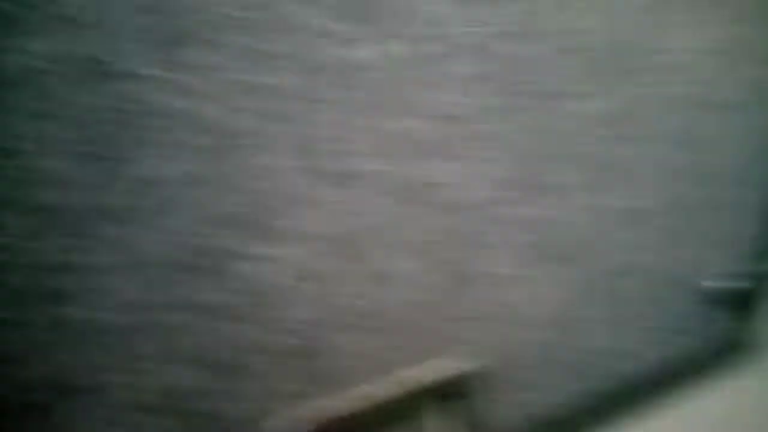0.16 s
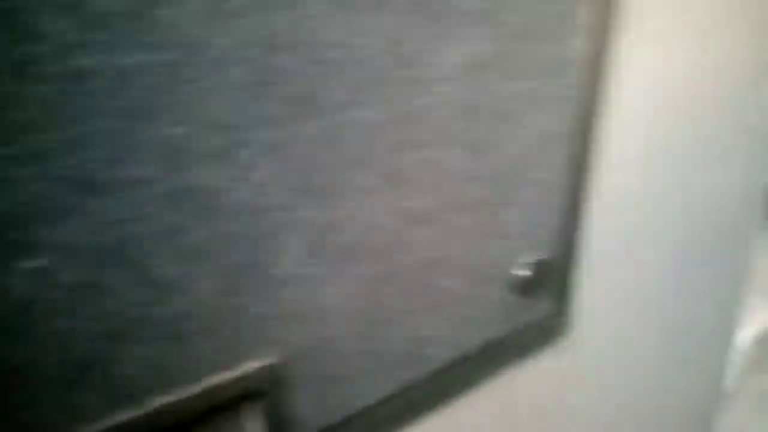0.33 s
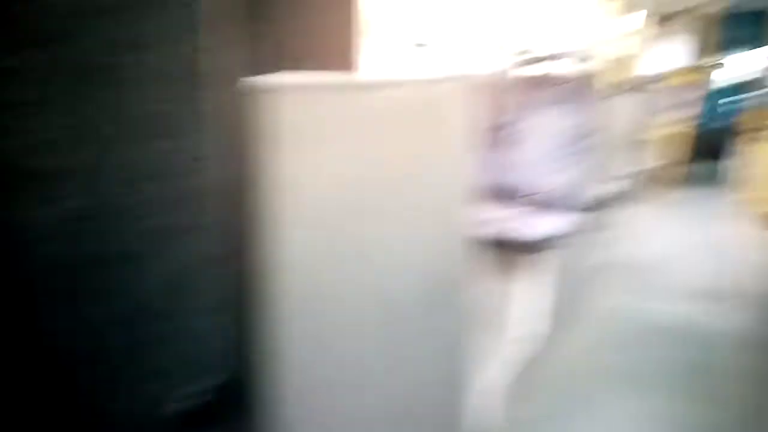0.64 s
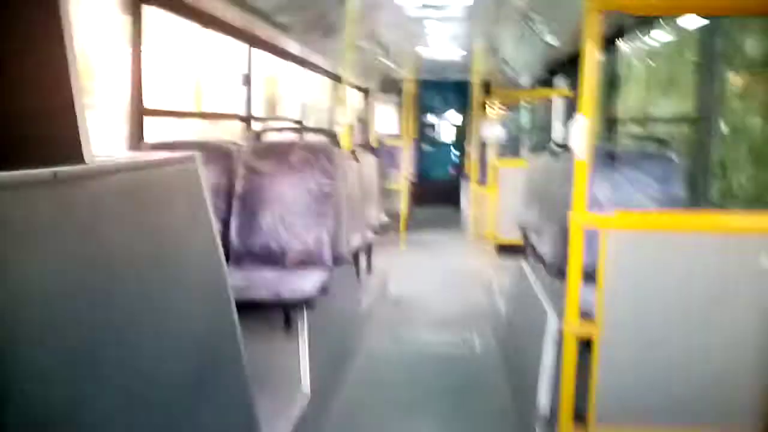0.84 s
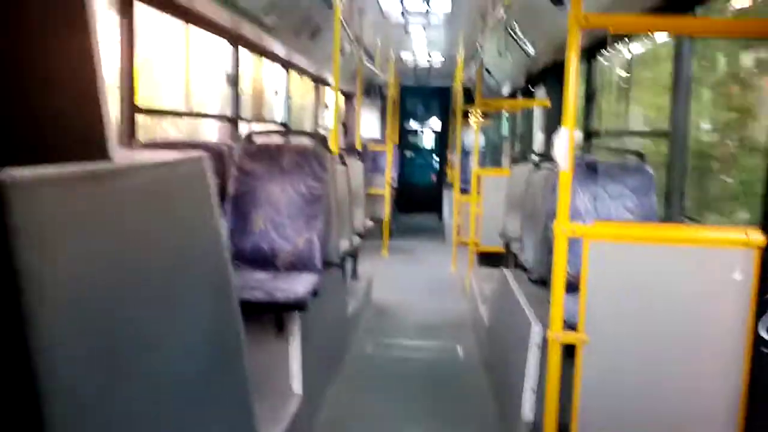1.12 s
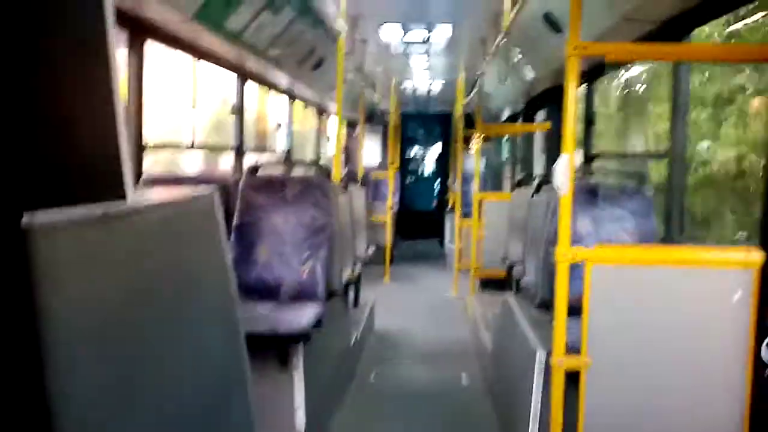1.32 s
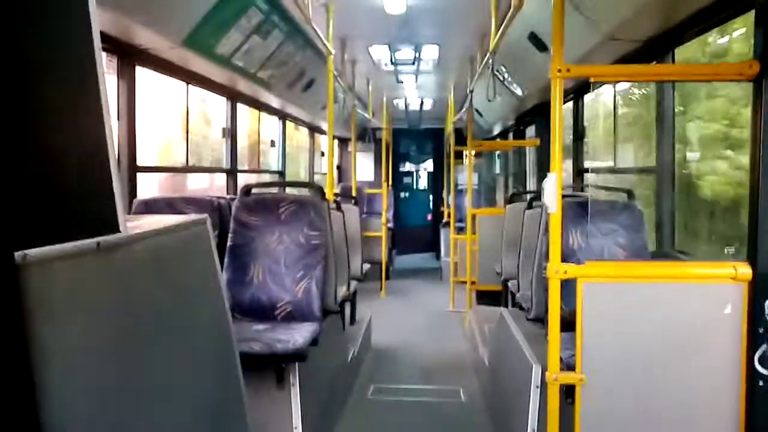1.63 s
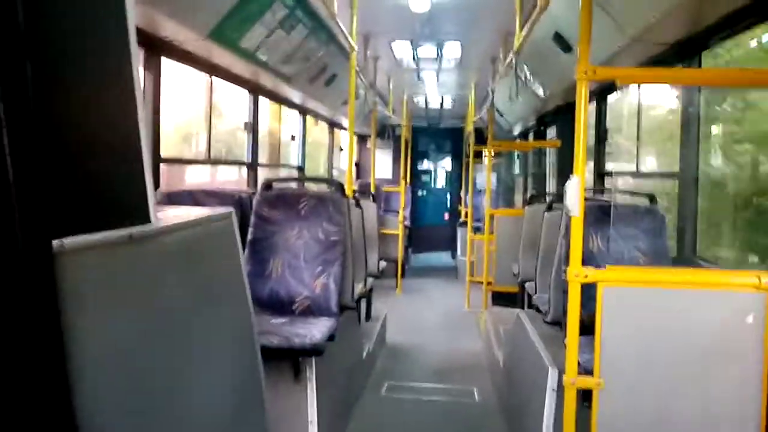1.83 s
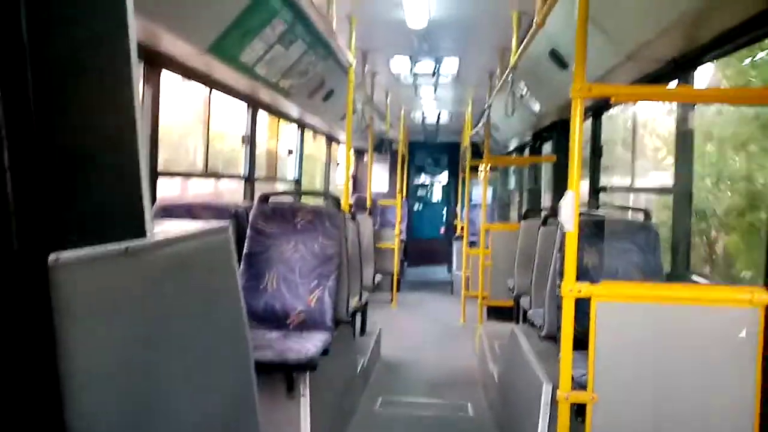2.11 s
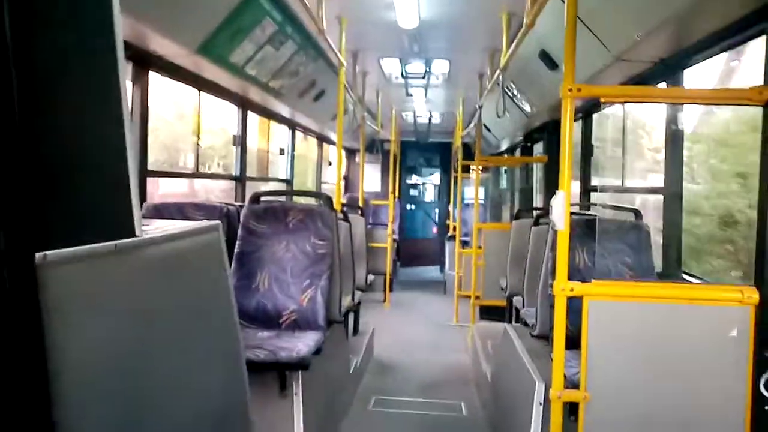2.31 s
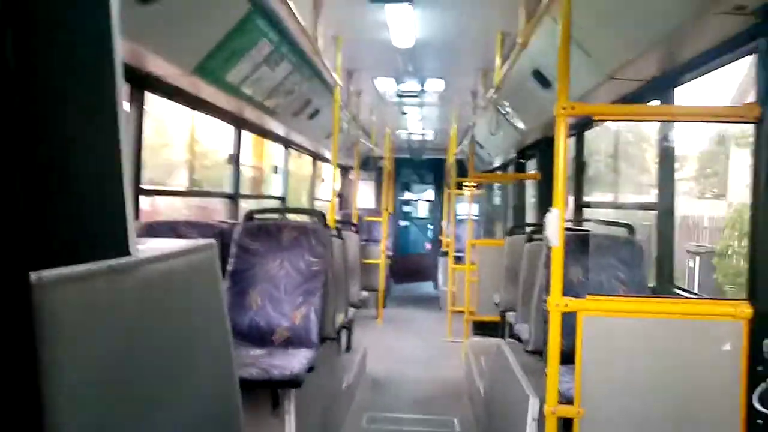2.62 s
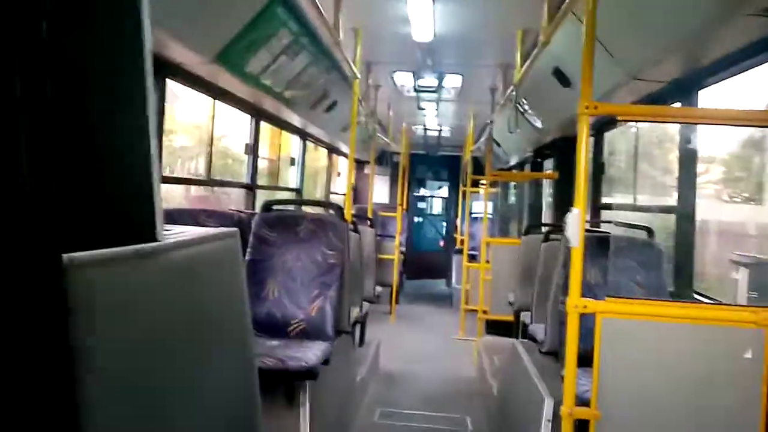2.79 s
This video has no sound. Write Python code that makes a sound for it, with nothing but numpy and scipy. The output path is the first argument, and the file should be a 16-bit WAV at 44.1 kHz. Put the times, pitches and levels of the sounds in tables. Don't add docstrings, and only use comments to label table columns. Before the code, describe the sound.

Inside a running city bus, a throbbing low hum and road roar continue throughout. Early bumps shake the fittings, engine pitch sinks slightly, and small finger clicks sit close on a handheld stereo microphone, bass heavier left.

```python
import sys
import numpy as np
from scipy import signal
from scipy.fft import rfft, irfft, next_fast_len
from scipy.io import wavfile
from scipy.ndimage import uniform_filter1d

SR = 44100
rng = np.random.default_rng(int(sys.argv[2]) if len(sys.argv) > 2 else 0)


def field_ratio(decibels):
    return 10 ** (np.asarray(decibels, dtype=float) / 20)


def file_out(sig):
    cols = np.atleast_2d(sig).T
    lim = np.clip(cols, -1, 1)
    pcm = np.round(lim * 32767).astype(np.int16)
    wavfile.write(sys.argv[1], SR, pcm)


N = 130095

# t/s, f/Hz
ENGINE_SPEED = [(0, 424), (.7, 423), (1.0, 415), (1.3, 412), (1.6, 407), (2.0, 405), (2.95, 405.5)]
# t/s, f/Hz
ROAD_SPEED = [(0.0, 302.2), (0.09, 294.0), (0.43, 296.2), (2.95, 299.1)]
WHINE_HZ, AXLE_HZ = 405, 299
# f/Hz, level before turn/dB, level after/dB, change t/s, wobble/dB
ENGINE_TONES = [(47, -36.5, -49.5, 1.7, 6), (122.2, -36.5, -56.5, 0.49, 6.5), (142.7, -38.5, -56.5, 1.2, 3),
                (181.2, -34, -46.5, 1.36, 2.5), (200.8, -46.5, -34, 1.37, 2), (215, -43, -34, 1.18, 0),
                (362.2, -48, -47, 1.5, 2.5), (386.8, -45, -42, 1.7, 1), (406.3, -39.5, -39.5, 0.87, 1.5),
                (643, -50.5, -54, 2.1, -4), (710, -54.5, -52, 1.4, 10.5), (805, -47.5, -51, 0.52, 1),
                (1130, -39, -55.5, 0.27, -1.8), (1182, -47, -64, 0.28, 4.5), (2370, -52.5, -58.5, 0.52, 0),
                (2397, -53, -65.5, 0.61, 5)]
# f/Hz, level before turn/dB, level after/dB, change t/s, wobble/dB
WHEEL_TONES = [(58.46, -45, -41, 1.9, -3.5), (300.1, -35, -32, 1.4, 1.7), (449, -56.5, -47, 0.94, 4.5),
               (492.4, -46.5, -46.5, 1.3, 1), (540.7, -43.5, -47.5, 1.3, 0.5), (598, -56.5, -44.5, 1.3, 0),
               (1016, -50.5, -52, 1.1, 3.5), (1116, -54.5, -56, 0.82, 1.5)]
CHANGE_S, WOBBLE_HZ, DRIFT_SHARE, PORT_SPREAD = 0.2, 5.037, 0.00405, 0.31
# tone f/Hz, t/s, lift/dB, half length/s
SWELLS = [(58.5, .2, 0, .06), (58.5, 2.62, 11, .08), (58.5, 2.86, 4.5, .06), (91.4, 0.29, 6.5, .04),
          (91.4, 0.25, -5.5, 0.063), (91.4, 0.35, 4.5, .04), (91.4, .68, -6.5, 0.093),
          (91.4, .84, 7.5, 0.044), (91.4, 1.1, -11, 0.02), (182.2, 0.19, 8, 0.045), (182.2, 0.4, 3, .05),
          (182.2, .66, -11, 0.11), (182.2, .86, -3, 0.054), (182.2, 1.05, -9.5, 0.086),
          (182.2, 0.82, 2, .07), (202.8, 1.58, 5.5, 0.049), (202.8, 2.9, -2, 0.035), (216.4, 1.2, 8, 0.071),
          (216.4, 2.88, 1.5, 0.067), (298.4, 0.011, -1.5, 0.05), (298.4, .17, 4.5, 0.1),
          (298.4, 1.43, -4.5, 0.057), (298.4, 1.3, 0.5, 0.053), (298.4, 1.7, -5, .05),
          (298.4, 2.133, 4.5, 0.061), (298.4, 1.85, 1, 0.091), (298.4, 2.47, -3.5, 0.056),
          (298.4, 2.75, 4.5, 0.091), (406.6, 1.504, 7, 0.11), (406.6, 0.84, 4.5, .04),
          (494.4, 0.58, 10.5, 0.17), (494.4, 1.55, 13, 0.031), (494.4, 2.55, 7.5, 0.2),
          (543, 2.1, 10, 0.051), (543, 2.16, 7, .04), (543, 2.47, 14.5, 0.055), (644, 1.08, 14.5, 0.13),
          (644, 0.913, 5, 0.076), (644, 1.34, 5, 0.12), (644, 0.51, 8, .08), (715, 2.35, -10, .15),
          (706, 0.055, -11, .1), (805.6, .02, -6, 0.052), (805.6, 0.18, 6, 0.14), (805.6, .43, 4.5, .05),
          (805.6, 2.6, 4, 0.063), (805.6, 3.1, 5.5, .08), (805.6, 1.8, -1, .05), (1110, .52, 10, 0.083),
          (2365, 0.19, 5, 0.046), (1013, .6, -2, .06), (1013, 1.9, 3.5, 0.044)]
SWELL_WIDTH_LOG_F = .012
# t/s, level/dB
BOOM = [(0.0, -34.5), (0.02, -27.5), (1.02, -35), (1.2, -28.5), (1.48, -35), (1.52, -25.5), (1.75, -36),
        (1.82, -25), (2.0, -29.5), (2.09, -25), (2.26, -30), (2.29, -44), (2.45, -23.5), (2.71, -35.5),
        (2.85, -27), (2.95, -29)]
BOOM_HZ, BOOM_LIFT_DB = 91.3, -3
# f/Hz, level/dB per Hz
RUMBLE_COLOUR = [(20, -34), (36, -17.5), (50, 2), (90, -2), (280, -4), (400, -8), (1020, -15.5),
                 (1700, -38)]
RUMBLE_DB, RUMBLE_SHARE = -28.5, 0.52
# f/Hz, level/dB per Hz
ROAR_COLOUR = [(600, -9), (1200, 0.5), (1900, -4), (2700, -4), (3700, -2.5), (4700, -6.5), (6300, -7),
               (8000, -30.5)]
# t/s, level/dB
PANEL = [(0.0, -37.5), (0.43, -38.5), (1.06, -35), (1.27, -38), (1.58, -40.5), (2.5, -39.5), (2.95, -40)]
ROAR_LIFT_DB = 3.5
# t/s, level/dB
RUB = [(0, -61), (.06, -72), (.5, -67), (.56, -64), (.61, -60), (.64, -70), (.68, -59.5), (.78, -59.5),
       (1.0, -65), (1.08, -62), (1.14, -68), (1.16, -71), (1.35, -79.5), (1.8, -85.5), (2.35, -83.5),
       (2.45, -76.5), (2.95, -87.5)]
# f/Hz, level/dB per Hz
RUSTLE_COLOUR = [(7000, 5), (7600, -2.5), (8600, -2), (13300, -12.5), (13900, -17.5), (14400, 0),
                 (15450, 2), (15800, -25)]
RUB_LIFT_DB, RUB_LEFT_DB = 11, -11.5
# t/s, peak level/dB, ring t60/s, left share/dB, 15 kHz port ring/dB
TICKS = [
    (0.0014, -49.5, 0.039, -24, -11),
    (0.163, -32.5, 0.03, -2, -7),
    (0.2929, -36, 0.041, -7, -10),
    (0.5557, -40.5, 0.054, -9, -7.5),
    (1.3872, -53, 0.04, -12, -12),
    (1.4897, -42.5, 0.025, -9, -15),
    (1.8025, -47.5, 0.073, -9, -16.5),
    (1.997, -41.5, 0.027, -13, -15),
    (2.3962, -50, 0.053, -14, -9),
    (2.6349, -57, 0.05, -11, -9),
]
# f/Hz, level/dB per Hz
TICK_COLOUR = [(3000, -41.5), (5000, 13.5), (7000, 10), (9000, -6), (12500, -5), (14000, -6.5),
               (15700, -18.5)]
# f/Hz, level/dB per Hz
PORT_COLOUR = [(13800, -17), (14500, -3), (15000, -1.5), (15500, -1.5), (15800, -23)]
TICK_LIFT_DB, TICK_RISE_S, TICK_TAIL_DB, TICK_TAIL_T60_S = 2.5, 0.00061, -9.5, 0.18
# t/s, level/dB, length/s
BUMPS = [(.11, -57, .03), (0.268, -41, 0.028), (0.51, -42, 0.075), (0.659, -35, 0.035),
         (0.761, -35.5, 0.029), (0.86, -47, .03), (0.869, -30, 0.056), (.96, -48, .03),
         (1.005, -32.5, 0.019), (1.063, -25.5, 0.044), (1.118, -35, 0.03), (1.246, -35, 0.045),
         (1.467, -43, 0.01), (1.517, -35.5, 0.053), (2.14, -43, .03), (2.395, -39, 0.083)]
# f/Hz, level/dB per Hz
SHAKE_COLOUR = [(500, -7.5), (1200, -5), (1700, -3.5), (2600, -1), (3200, -2.5), (4200, -6.5), (6000, -9),
                (7500, -20.5)]
BUMP_RISE_S = 0.0046
# f/Hz, likeness/1
LIKENESS = [(60, 0.89), (250, 1), (500, 0.81), (800, 0.26), (1200, .12), (2000, .03)]
# f/Hz, left minus right/dB
LEFT_PORT = [(25, 5), (70, 6.5), (290, 7), (640, 8), (1410, 7.5), (2700, 0.5), (5500, -12), (9000, -40.5)]
# f/Hz, phase/rad
LEFT_LEAD = [(20, .2), (60, .5), (100, 0.68), (160, 1.01), (270, 1.49), (450, 2.81), (600, 3.42),
             (1200, 7.2)]
SELF_NOISE_DB = [
    [-91],
    [-72.5],
]
# f/Hz, left level/dB, right level/dB
GATE = [(5000, -115, -115), (6500, -101, -108), (7400, -97, -100), (7900, -97, -90), (9300, -102, -91),
        (10100, -111, -102), (13600, -111, -102), (14400, -110, -98), (15300, -110, -97),
        (15800, -105, -90)]
GATE_SCATTER_DB, GATE_UNDER_DB, GATE_FROM_HZ = 11, 3.1, 7700
LOW_CUT_HZ, EDGE_S = 46, .0012


def evened(x):
    return x / np.sqrt(np.mean(x ** 2) + 1e-20)


def read(points, hz):
    f_hz, value = np.transpose(points)
    return np.interp(np.log(hz + 1), np.log(f_hz + 1), value)


def curve(points, t):
    return np.interp(t, *np.transpose(points))


def slow(t, top_hz):
    f_hz = np.geomspace(top_hz / 12, top_hz, num=14)[:, None]
    sines = np.sin(2 * np.pi * (f_hz * t + rng.random(f_hz.shape)))
    return evened((sines / np.sqrt(f_hz)).sum(0))


def noise(colour, patch_db, flutter_db, size=512):
    hop, hz = size // 4, np.fft.rfftfreq(size, 1 / SR)
    frames = N // hop + 6
    a, b, c, d, patches = rng.standard_normal((frames, len(hz), 5)).T
    patches = uniform_filter1d(patches, size=6, axis=0)
    patches = evened(uniform_filter1d(patches, size=16, axis=1))
    same = np.clip(read(LIKENESS, hz), -1, 1)[:, None]
    right = a + 1j * b
    left = same * right + np.sqrt(1 - same ** 2) * (c + 1j * d)
    outside = (hz < colour[0][0]) | (hz > colour[-1][0])
    colour_db = np.where(outside, -90, read(colour, hz))[:, None]
    flutter = slow(np.arange(frames) * hop / SR, 14)
    z = np.array([left, right]) * field_ratio(colour_db + patch_db * patches + flutter_db * flutter)
    return evened(signal.istft(z, nperseg=size, noverlap=size - hop)[1][:, :N])


def swell_db(hz, t):
    f_hz, at_s, lift_db, half_s = np.transpose(SWELLS)
    touch_db = np.exp(-(np.log(hz / f_hz) / SWELL_WIDTH_LOG_F) ** 2) * lift_db
    coarse = t[::256]
    humps = np.exp(-((coarse - at_s[:, None]) / half_s[:, None]) ** 2)
    return np.interp(t, coarse, touch_db @ humps)


def tones(rows, speed, t):
    out = np.zeros((2, N))
    coarse = t[::256]
    for hz, before_db, after_db, at_s, wobble_db in rows:
        turned = .5 + .5 * np.tanh((t - at_s) / CHANGE_S)
        wobble, drift, apart = (np.interp(t, coarse, slow(coarse, WOBBLE_HZ)) for _ in range(3))
        level_db = before_db + (after_db - before_db) * turned
        level_db = level_db + wobble_db * np.tanh(wobble) + swell_db(hz, t)
        cycles = np.cumsum(hz * (speed + DRIFT_SHARE * drift)) / SR
        phase = 2 * np.pi * (cycles + rng.random())
        spread = np.arccos(np.clip(read(LIKENESS, hz), 0, 1)) * PORT_SPREAD * apart
        out += np.sqrt(2) * field_ratio(level_db) * np.sin([phase + spread, phase])
    return out


def boom(speed, t):
    level_db = curve(BOOM, t) + BOOM_LIFT_DB + swell_db(BOOM_HZ, t)
    return np.sqrt(2) * field_ratio(level_db) * np.sin(2 * np.pi * np.cumsum(BOOM_HZ * speed) / SR)


def body(t):
    near_db = curve(PANEL, t)
    rumble_db = RUMBLE_DB + RUMBLE_SHARE * (near_db - near_db.mean())
    rumble = field_ratio(rumble_db) * noise(RUMBLE_COLOUR, 0.35, 0.18, size=2048)
    roar = field_ratio(near_db + ROAR_LIFT_DB) * noise(ROAR_COLOUR, 1.85, 0.5, size=2048)
    return rumble + roar


def hand(t):
    crack = noise(TICK_COLOUR, 2.0, 0, size=256)
    whistle = noise(PORT_COLOUR, 2.1, 0, size=256)
    rub_db = curve(RUB, t) + RUB_LIFT_DB + np.array([[RUB_LEFT_DB], [0]])
    out = field_ratio(rub_db) * noise(RUSTLE_COLOUR, 2.2, 1.7, size=1024)
    for at_s, peak_db, t60_s, left_db, port_db in TICKS:
        since_s = np.maximum(t - at_s, 0)
        attack = np.minimum(since_s / TICK_RISE_S, 1)
        ring = field_ratio(-60 * since_s / t60_s) + field_ratio(TICK_TAIL_DB - 60 * since_s / TICK_TAIL_T60_S)
        sides = field_ratio(peak_db + TICK_LIFT_DB + np.array([[left_db], [0]]))
        out += sides * attack * ring * (crack + field_ratio(port_db) * whistle)
    return out


def fittings(t):
    envelope = np.zeros(N)
    for at_s, level_db, length_s in BUMPS:
        since_s = np.maximum(t - at_s, 0)
        attack = np.minimum(since_s / BUMP_RISE_S, 1)
        envelope += field_ratio(level_db) * attack * np.exp(-(since_s / length_s) ** 2)
    return envelope * noise(SHAKE_COLOUR, 2.5, 1.6, size=512)


def scene():
    t = np.arange(N) / SR
    engine = curve(ENGINE_SPEED, t) / WHINE_HZ
    wheels = curve(ROAD_SPEED, t) / AXLE_HZ
    hum = tones(ENGINE_TONES, engine, t) + tones(WHEEL_TONES, wheels, t) + boom(engine, t)
    return hum + body(t) + hand(t) + fittings(t)


def gate(x, order=16):
    padded = np.pad(x, ((0, 0), (0, 2048)), "reflect", reflect_type="odd")
    hz, _, z = signal.stft(padded, SR, nperseg=2048, noverlap=1536)
    band = np.arange(len(hz)) // order
    band_hz = hz[::order]
    power = np.add.reduceat(abs(z) ** 2, np.arange(0, len(hz), order), axis=1) / order
    level_db = 10 * np.log10(power + 1e-20)
    f_hz, left_db, right_db = np.transpose(GATE)
    edge_db = np.array([np.interp(band_hz, f_hz, v, left=-200) for v in (left_db, right_db)])[:, :, None]
    around_db = uniform_filter1d(uniform_filter1d(level_db, size=5, axis=1), size=9, axis=2)
    raised_db = np.maximum(edge_db, around_db - GATE_UNDER_DB)
    edge_db = np.where(band_hz[:, None] > GATE_FROM_HZ, raised_db, edge_db)
    scatter = evened(uniform_filter1d(rng.standard_normal(level_db.shape), size=3, axis=2))
    keep = np.clip((level_db - edge_db - GATE_SCATTER_DB * scatter) / 2, 0, 1)
    return signal.istft(z * keep[:, band], SR, nperseg=2048, noverlap=1536)[1][:, :N]


def roll_off(x):
    return signal.sosfilt(signal.butter(12, 15830, fs=SR, output="sos"), x)


def record(dry):
    size = next_fast_len(N + 8192)
    hz = np.fft.rfftfreq(size, 1 / SR)
    left = field_ratio(read(LEFT_PORT, hz)) * np.exp(1j * read(LEFT_LEAD, hz))
    ports = np.array([left, np.ones(len(hz))])
    low_cut = 1 / np.sqrt(1 + (LOW_CUT_HZ / (hz + 1)) ** 6)
    padded = np.pad(dry, ((0, 0), (0, 2048)), "reflect", reflect_type="odd")
    heard = irfft(rfft(padded, size) * ports * low_cut, size)[:, :N]
    hiss = field_ratio(np.array(SELF_NOISE_DB)) * rng.standard_normal((2, N))
    from_end = np.minimum(np.arange(N) + 1, N - np.arange(N))
    ends = np.sin(np.pi / 2 * np.clip(from_end / (EDGE_S * SR), 0, 1)) ** 2
    return roll_off(ends * gate(heard + hiss))


dry = scene()
out = record(dry)
file_out(out)
```